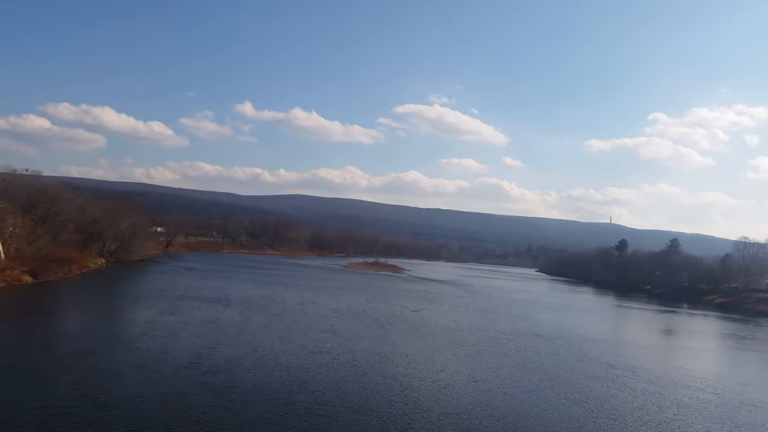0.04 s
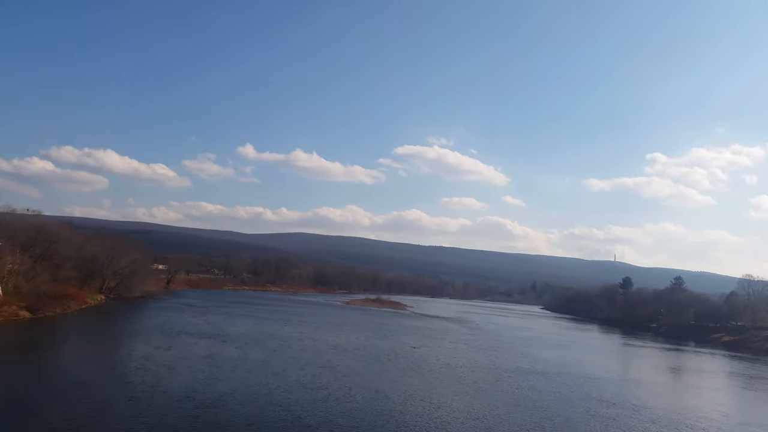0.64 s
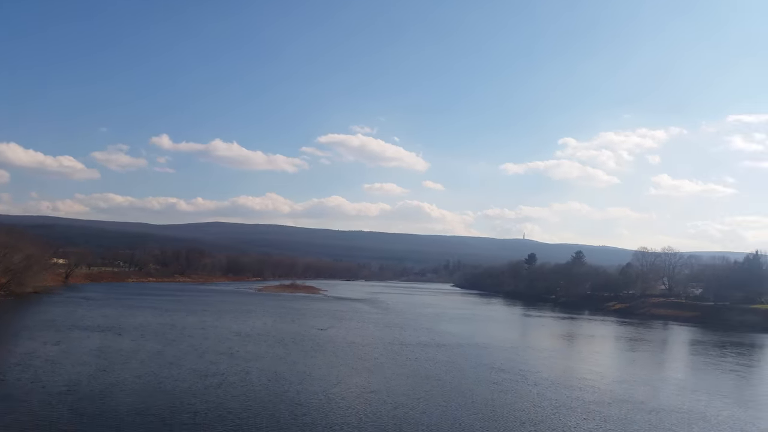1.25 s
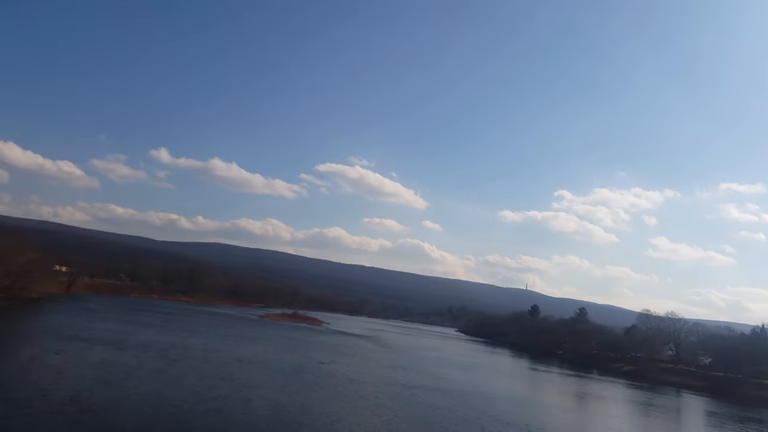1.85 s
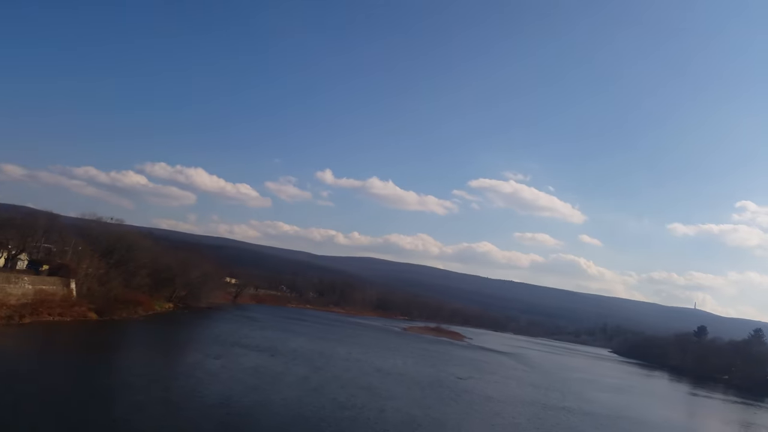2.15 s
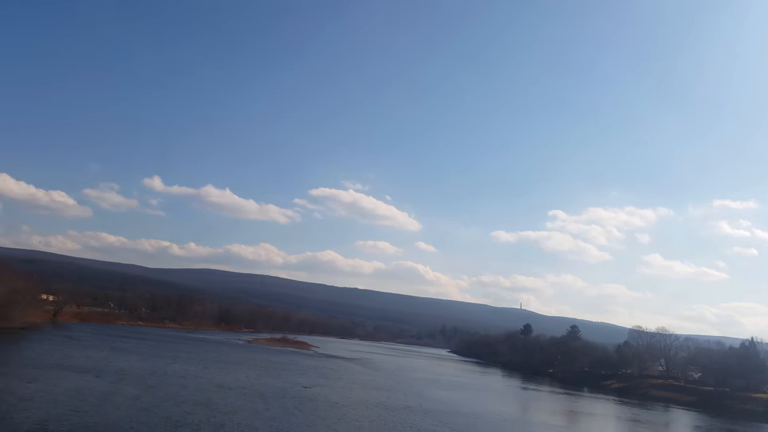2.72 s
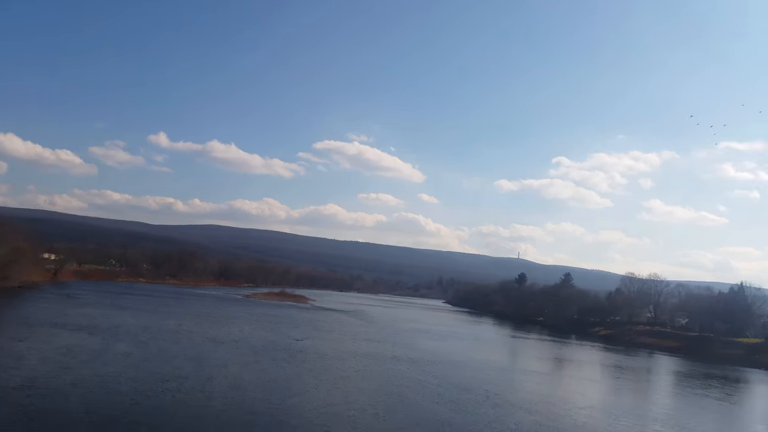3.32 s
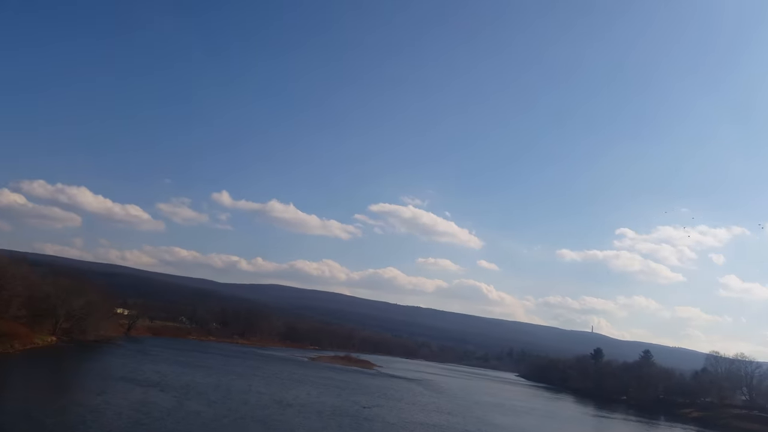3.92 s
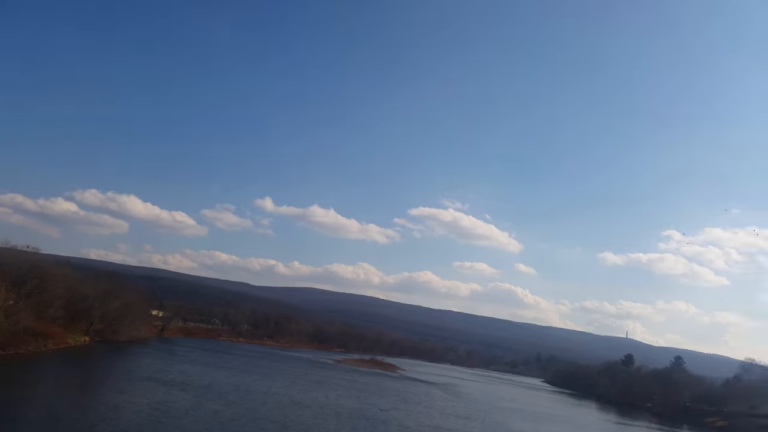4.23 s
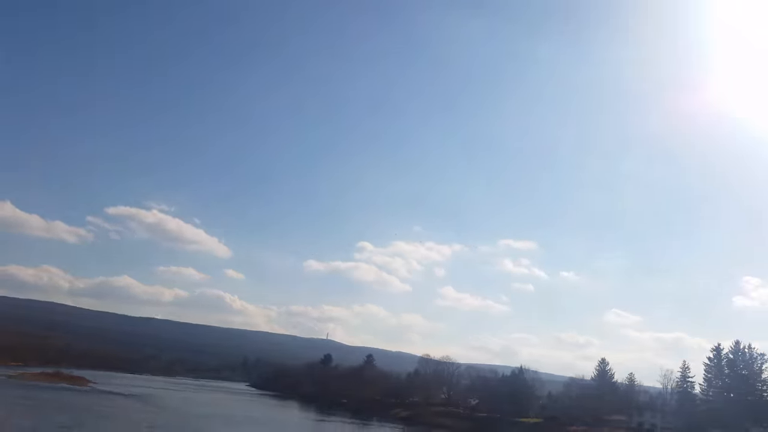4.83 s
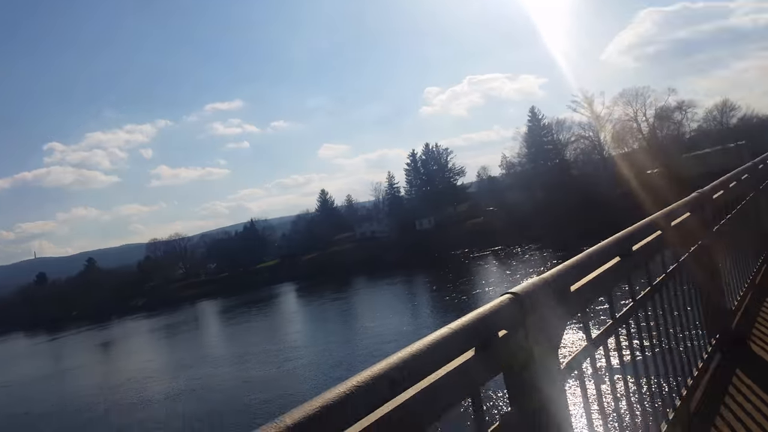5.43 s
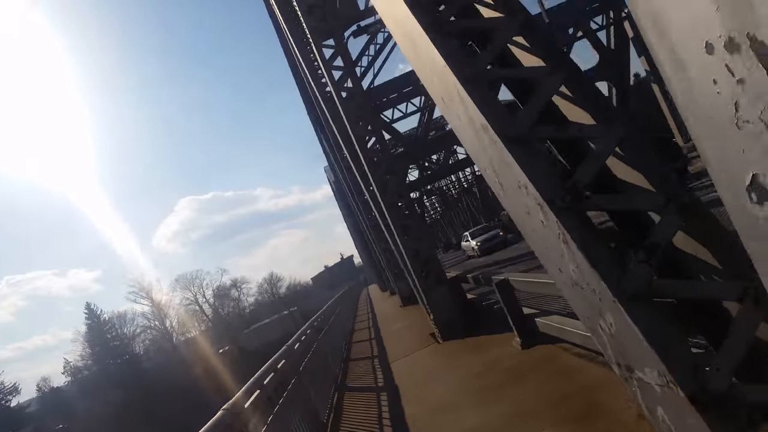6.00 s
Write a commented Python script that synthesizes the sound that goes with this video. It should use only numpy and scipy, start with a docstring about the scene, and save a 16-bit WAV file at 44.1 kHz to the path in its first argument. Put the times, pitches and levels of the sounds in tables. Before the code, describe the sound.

Low wind rumbles and thumps on the microphone as passing car tyres drone over a steel bridge and a bicycle chain ticks faintly.

```python
"""Wind buffets a two-port microphone riding, probably on a bicycle, along a steel bridge's walkway.
Its eddies rumble, thump and rip at each port. Three cars sing in turn as their tyres strike the ribbed
deck, over the boom of the deck and a wash of tyre roar. The chain sizzles faintly at first, link by
link; a hiss of rushing air grows at the end, as when the microphone turns to face ahead."""
import sys
import numpy as np
from scipy import signal
from scipy.fft import rfft, irfft
from scipy.io import wavfile
from scipy.ndimage import uniform_filter1d, minimum_filter1d

SR = 44100
rng = np.random.default_rng(int(sys.argv[2]) if len(sys.argv) > 2 else 0)


def waveform_to_disk(signal):
    """Save audio, clipped to [-1, 1], as 16-bit WAV at the path in sys.argv[1]."""
    frames = np.transpose(np.atleast_2d(signal))
    scaled = np.clip(frames, -1, 1) * 32767
    samples = np.round(scaled).astype(np.int16)
    wavfile.write(sys.argv[1], SR, samples)


N = 271656
T = np.arange(N) / SR
HZ = np.fft.rfftfreq(N, 1 / SR)


def gain_of(db):
    """Decibels to amplitude."""
    return 10 ** (np.asarray(db) / 20)


def unit_rms(x):
    """Scales to an rms of 1."""
    return x / np.sqrt(np.mean(abs(x) ** 2) + 1e-20)


def curves(rows):
    """Each column of a table, joined by straight lines in time."""
    times, *columns = np.transpose(rows)
    return [np.interp(T, times, column) for column in columns]


def spectra(rows):
    """Each column of a table, joined on a log-frequency axis."""
    hz, *columns = np.transpose(rows)
    return np.array([np.interp(np.log(HZ + 1), np.log(hz + 1), column) for column in columns])


def white(channels=2):
    """White noise spectra, one for each channel."""
    return rng.standard_normal((channels, len(HZ))) + 1j * rng.standard_normal((channels, len(HZ)))


def drift(rate_hz, channels=2):
    """A random wobble of rms 1, up to about rate_hz."""
    return unit_rms(irfft(white(channels) / (1 + (HZ / rate_hz) ** 4), N))


def bell(hz, width_hz):
    """Gain curve of one resonance."""
    return 1 / (1 + ((HZ - hz) / (0.51 * width_hz)) ** 2)


def swell(peak_s, length_s):
    """A smooth rise and fall around peak_s."""
    return np.exp(-(2 * (T - peak_s) / length_s) ** 2)


# Gusts that swell and die. Each row: peak time in seconds, length in seconds, peak level in dB,
# port (0 left, 1 right).
GUSTS = [(0.28, 0.19, -11.5, 0), (0.957, 0.38, -10.5, 0), (2.175, 0.22, -17, 0), (2.858, 0.27, -13.5, 0),
         (3.358, 0.44, -17, 0), (3.9, 0.16, -16, 0), (4.435, 0.33, -16, 0), (4.769, 0.045, -11, 0),
         (5.262, 0.15, -20.5, 0), (5.85, 0.15, -16.5, 0), (0.172, .22, -22.5, 1), (3.955, 0.22, -21, 1),
         (4.386, 0.17, -17, 1), (4.6, 0.38, -17, 1), (5.144, 0.1, -16.5, 1), (5.462, 0.086, -30, 1),
         (6.003, 0.17, -19, 1)]
# The tone of the turbulence. Each row: frequency in Hz, relative level in dB.
RUMBLE_TONE = [(8, -13.5), (20, -14.5), (40, -11), (60, -5), (90, -0.5), (130, -5), (200, -10.5),
               (300, -13), (500, -19), (900, -38.5), (2000, -53.5), (5000, -89)]


def wind(breeze_db=(-19.5, -20), unsteady_db=-0.64, lumpy_db=2, tearing_db=4.5, split_hz=240, leak=0.11):
    """Gusts ride on a breeze. Each port has its own turbulence, felt a little by the other."""
    power = gain_of(breeze_db)[:, None] ** 2 * np.ones(N)
    for peak_s, length_s, db, port in GUSTS:
        power[round(port)] += gain_of(db) ** 2 * swell(peak_s, length_s)
    push = np.sqrt(power) * gain_of(unsteady_db * drift(5))
    turbulence = unit_rms(irfft(white() * gain_of(spectra(RUMBLE_TONE)), N))
    large_eddies = irfft(rfft(turbulence) / (1 + (HZ / split_hz) ** 4), N)
    small_eddies = turbulence - large_eddies
    lumps = drift(37)  # one wobble drives both the heaving lows and the tearing highs
    heave = unit_rms(gain_of(lumpy_db * lumps))
    bursts = gain_of(-2) * unit_rms(gain_of(tearing_db * lumps))
    ports = push * (large_eddies * heave + small_eddies * bursts) + buffets()
    return ports + leak * ports[::-1]


# How far the right port, on the road side, leads. Each row: frequency in Hz, phase in radians.
RIGHT_PORT_LEAD = [(20, -1.5), (420, 0.08), (700, 2), (1000, -1), (1300, 4), (1800, 4.5), (2400, 7.5),
                   (3200, 9), (4100, 14.5), (6000, 29)]


def road_noise(tone, likeness):
    """Noise from the road side; reflections from the truss make the two ports less alike."""
    direct, scattered = white()
    lag = np.exp(-1j * spectra(RIGHT_PORT_LEAD)[0])
    left = likeness * direct * lag + np.sqrt(1 - likeness ** 2) * scattered
    return unit_rms(irfft(np.array([left, direct]) * tone, N))


# The deck's booming modes. Each row: centre in Hz, width in Hz, relative level in dB.
DECK_MODES = [(163.3, 10, -7), (178.7, 59, 1.5), (246, 37, -9), (300, 210, -15)]
# The fader ride on the boom. Each row: time in seconds, relative level in dB.
BOOM_RIDE = [(0, -20), (1.1, -22.5), (1.8, -24.5), (2.25, -17.5), (3.3, -20), (4.1, -16.5), (4.5, -20),
             (5.5, -20.5), (6.16, -18)]
# The tone of the tyre roar. Each row: frequency in Hz, relative level in dB.
ROAR_TONE = [(40, -10), (100, 4), (150, 3.5), (300, -1), (450, -0.5), (700, -3.5), (1000, -11.5),
             (1500, -18.5), (2000, -26.5), (2600, -32), (4000, -37), (6500, -68)]
# The roar's stereo image. Each row: frequency in Hz, likeness of the two ports from 0 to 1.
ROAR_LIKENESS = [(200, .95), (450, 0.97), (800, 0), (1300, 0.52), (1800, 0.5), (2600, 0.8), (5000, 0)]
# The ride on the roar. Each row: time in seconds, relative level in dB, lean to the left in dB.
ROAR_RIDE = [(0, -35.5, 1), (.3, -39.5, -0.5), (.75, -35, 0), (1, -42, -1), (1.4, -36, -0.5),
             (1.87, -34, -2), (2.25, -36, -1.5), (2.5, -33.5, 0), (2.9, -36, -1), (3.85, -35, -0.3),
             (4.4, -38, -0.3), (5.55, -37, 0), (6.03, -33, -0.5)]


def traffic(boom_db=0.5, roar_db=10.5, lean_db=-0.17, patchy_db=1.67):
    """Wheels keep the deck's modes booming under the broad roar of the tyres."""
    deck_tone = sum(gain_of(db) * bell(hz, width_hz) for hz, width_hz, db in DECK_MODES)
    boom = road_noise(deck_tone, likeness=0.91) * gain_of(curves(BOOM_RIDE)[0] + boom_db)
    roar = road_noise(gain_of(spectra(ROAR_TONE)[0]), spectra(ROAR_LIKENESS)[0])
    ride_db, pan_db = curves(ROAR_RIDE)
    roar *= gain_of(ride_db + np.array([pan_db, -pan_db]) + roar_db + patchy_db * drift(26))
    return (boom + roar) * gain_of([[lean_db], [-lean_db]])


# Cars singing on the deck. Each row: passing time in seconds, seconds to fade by 3 dB, rib rate in Hz,
# hum level in dB, overtone trim in dB, detune of each pair as a share, hum roughness from 0 to 1.
CARS = [(0.6, 1.8, 80.78, -25.5, -17, .02, 0.6), (2.498, 0.96, 115.7, -18, -1.5, .045, 0.47),
        (5.45, 0.5, 98.58, -18.5, -15, .04, 0.7)]
# The hum's partials; the upper ones are thrown ahead, so they peak earlier. Each row: multiple of
# the rib rate, relative level in dB, lead and span, both in fade times.
HUM_PARTIALS = [(2, -0.15, 0.022, 1), (3, -7.5, 0.85, 0.55), (4, -9, 0.12, 0.77), (5, -13, 0.78, 0.45),
                (6, -19, 0.09, 0.64)]
# One partial blooms or ducks, probably as echoes from the truss meet it. Each row: peak time in
# seconds, length in seconds, boost or cut in dB, multiple of the rib rate.
HUM_SWELLS = [(0.108, 0.13, 12.5, 2), (0.506, 0.073, 16.5, 2), (1.105, 0.13, -3, 2), (1.579, 0.33, 5, 3),
              (1.681, 0.053, 15.5, 4), (1.68, .12, 3.5, 2), (1.78, 0.082, -16, 4), (1.847, 0.1, 7, 3),
              (1.912, 0.15, 11.5, 4), (1.845, 0.15, 4, 2), (2.01, 0.15, 7.5, 2), (2.195, 0.075, 9.5, 6),
              (2.3, 0.048, 10.5, 2), (2.387, 0.054, -18, 4), (2.42, 0.11, -8, 2), (2.49, 0.06, 2.5, 4),
              (2.508, 0.042, 4.5, 2), (2.675, 0.045, 5, 2), (2.71, 0.21, 4, 5), (2.827, 0.12, -6, 2),
              (3.065, 0.35, 6.5, 2), (3.205, 0.05, 5, 2), (3.12, 0.12, 4.5, 6), (3.14, 0.22, 8.5, 3),
              (3.29, .2, 12.5, 5), (4.874, 0.2, 5, 2), (5.517, 0.12, 9, 2), (5.757, 0.11, 13, 2)]


def car(pass_s, fade_s, rib_hz, hum_db, overtones_db, detune, hum_rough,
        overtones_rough=0.56, blur_hz=10, waver=0.009, slowing_per_s=0.008, lean_db=1.0):
    """Tyres drum on the ribs. Each partial is a beating pair, blurred by echoes, fading with distance."""
    pair_hz = rib_hz * (1 - slowing_per_s * (T - pass_s)) * (1 + detune * np.array([[-.5], [.5]]))
    turns = np.cumsum(pair_hz * (1 + waver * drift(7.6)), axis=1) / SR
    pair_gains = unit_rms(gain_of([0, -5.5])) / np.sqrt(2)
    hum = np.zeros(N)
    for multiple, db, lead, span in HUM_PARTIALS:
        is_overtone = multiple > 2
        distance = np.hypot(1, ((T - pass_s) / fade_s + lead) / span)
        swell_db = sum(boost_db * swell(peak_s, length_s)
                       for peak_s, length_s, boost_db, which in HUM_SWELLS
                       if which == multiple and nearest_pass(peak_s) == pass_s)
        rough = overtones_rough if is_overtone else hum_rough
        blur_real, blur_imag = drift(blur_hz * np.sqrt(multiple / 2))
        swing = np.sqrt(2 - 2 * rough ** 2) * gain_of(swell_db) + rough * (blur_real + 1j * blur_imag)
        pair = pair_gains @ np.exp(2j * np.pi * multiple * turns)
        hum += gain_of(hum_db + db + overtones_db * is_overtone) * (swing * pair).real / distance
    return hum * gain_of([[lean_db], [-lean_db]])


def nearest_pass(time_s):
    """The passing time of the car that goes by closest to time_s."""
    return min((row[0] for row in CARS), key=lambda pass_s: abs(pass_s - time_s))


# The ride on the rushing air. Each row: time in seconds, relative level in dB.
AIR_RIDE = [(0, -50), (.3, -54.5), (.78, -50.5), (1.08, -62.5), (1.3, -54), (2.3, -53.5), (2.47, -51),
            (3.55, -53), (3.72, -50.5), (4.05, -51), (4.35, -53.5), (4.9, -49), (5.1, -46), (5.25, -45),
            (5.4, -48.5), (5.5, -44.5), (5.85, -41), (5.97, -36.5), (6.16, -36.5)]
# Each port's colour, with its notch and resonance; it tints the chain too.
# Each row: frequency in Hz, left gain in dB, right gain in dB.
PORT_TONE = [(800, -21.5, -20.5), (2500, 1, 1.5), (3500, -18, 3), (5060, -20, 2), (5570, -25, -11.5),
             (6300, -33, -33.5), (8140, -15.5, -32.5), (8580, -6, -30), (9140, -5, -9), (11000, -2.5, 1),
             (11250, -1, 2), (13000, -8, -0.5), (14500, -8, -3.5)]


def air_hiss(level_db=4, flutter_db=1.3, flutter_hz=45, low_follows=0.42, low_db=-3.0, split_hz=6500):
    """Fine turbulence hisses through the ports and flutters; the top follows the air speed most."""
    ride_db, = curves(AIR_RIDE)
    hiss = unit_rms(irfft(white() * gain_of(spectra(PORT_TONE)), N))
    low = irfft(rfft(hiss) / (1 + (HZ / split_hz) ** 8), N)
    top = hiss - low
    middle_db = np.median(ride_db)
    low_ride_db = middle_db + low_follows * (ride_db - middle_db) + low_db
    flutter = gain_of(level_db + flutter_db * drift(flutter_hz, channels=1))
    return flutter * (low * gain_of(low_ride_db) + top * gain_of(ride_db))


# The ride on the chain's sizzle. Each row: time in seconds, relative level in dB.
CHAIN_RIDE = [(0, -63), (.3, -58), (.7, -48), (1.05, -60), (1.25, -51), (1.75, -58.5), (2.3, -58.5),
              (2.5, -51), (3.1, -54.5), (3.6, -55.5), (4.2, -57), (4.8, -72)]
# Brief, bright high ticks and clinks. Each row: start in seconds, relative level in dB.
CLINKS = [(.049, -45), (.164, -45), (0.244, -49), (.412, -44), (.47, -41), (0.547, -44.5), (.698, -46),
          (1.24, -51), (1.292, -48), (1.475, -56), (1.866, -46), (1.982, -44.5), (2.179, -40), (2.414, -44),
          (2.454, -46), (2.807, -41), (2.902, -43), (3.043, -41), (3.121, -39), (4.302, -43), (5.59, -35),
          (5.946, -28)]


def chain(links_per_s=51.3, level_db=-6.5, uneven_db=6.5, ring_s=0.0052,
          clink_db=-1.0, clink_ring_s=0.0091, bright_hz=6000, waver=0.008):
    """Each link lands on a sprocket tooth with a tiny metallic burst, some harder than others."""
    ride_db, = curves(CHAIN_RIDE)
    link_rate = links_per_s * (1 + waver * drift(2.0, channels=1)[0])
    links = np.cumsum(link_rate) / SR
    accent_db = uneven_db * rng.uniform(-1, 1, N)[links.astype(int)]
    since_landing_s = (links % 1) / link_rate
    ticks = unit_rms(gain_of(accent_db) * np.exp(-since_landing_s / ring_s))
    envelope = gain_of(ride_db + level_db) * ticks
    for start_s, db in CLINKS:
        envelope += gain_of(db + clink_db) * (T >= start_s) * np.exp(-abs(T - start_s) / clink_ring_s)
    tone = gain_of(spectra(PORT_TONE)) * HZ ** 2 / (HZ ** 2 + bright_hz ** 2)
    return uniform_filter1d(envelope, size=100) * unit_rms(irfft(white() * tone, N))


# The hardest thumps of wind. Each row: peak time in seconds, level in dB, pitch in Hz,
# port (0 left, 1 right).
BUFFETS = [(0.205, -8, 78.4, 0), (0.23, -7, 280, 0), (.252, -17, 110, 0), (0.343, -2.5, 110, 0),
           (.836, -13, 98.5, 0), (0.879, -8, 162, 0), (0.948, 2, 94, 0), (1.009, -7, 81, 0),
           (1.069, -11, 87, 0), (1.118, -3.5, 273, 0), (2.124, -5, 105, 0), (2.207, 0, 86.6, 0),
           (2.251, -4, 280, 0), (2.288, -3.5, 273, 0), (2.868, -5, 103, 0), (3.238, -11, 95, 0),
           (3.405, -3, 84.5, 0), (4.265, -10, 100.5, 0), (4.281, -3, 278, 0), (4.319, -12, 131, 1),
           (4.355, -4, 97, 1), (4.388, -6, 99.4, 0), (4.413, -9, 88, 0), (4.457, -7, 97, 1),
           (4.522, -4.5, 98, 0), (4.587, -18, 79, 1), (4.666, -9.5, 76, 1), (4.728, -6, 107, 0),
           (5.195, -6, 75, 0), (5.31, -4, 116, 0), (5.45, -5, 102, 1), (5.48, -7, 73, 1),
           (5.899, -8, 110, 0)]


def buffets(width_cycles=0.73):
    """An eddy thumps a port with a soft swing or two of pressure: the smaller, the quicker."""
    out = np.zeros((2, N))
    for (peak_s, db, hz, port), phase in zip(BUFFETS, rng.random(len(BUFFETS))):
        near = abs(T - peak_s) < .06
        cycles = (T[near] - peak_s) * hz
        thump = np.cos(2 * np.pi * (cycles + phase)) / np.cosh(2 * cycles / width_cycles)
        out[round(port), near] += gain_of(db) * thump
    return out


# Sharp rips of wind. Each row: peak time in seconds, level in dB, length in seconds, centre in Hz,
# port (0 left, 1 right).
RIPS = [(0.233, -24, 0.0089, 750, 0), (.708, -23.5, 0.0042, 1050, 0), (0.778, -21.5, 0.0027, 1100, 0),
        (0.822, -20, 0.0076, 796, 0), (0.828, -29, 0.0042, 780, 0), (0.843, -21.5, 0.012, 855, 0),
        (0.881, -22.5, 0.0033, 800, 0), (0.92, -28, 0.0095, 940, 0), (2.19, -22.5, .005, 820, 0),
        (2.24, -19, .008, 760, 0), (2.274, -21, .005, 800, 0), (2.312, -25.5, 0.0025, 900, 0),
        (3.127, -24, .005, 800, 0), (4.286, -26, .004, 650, 0), (4.483, -17.5, 0.007, 640, 1)]


def rips(width_hz=820):
    """A tiny, fast eddy tears past a port in a few milliseconds."""
    out = np.zeros((2, N))
    for peak_s, db, length_s, hz, port in RIPS:
        envelope = swell(peak_s, length_s)
        noise = irfft(white(channels=1)[0] * bell(hz, width_hz) ** 2, N)
        out[round(port)] += gain_of(db) * unit_rms(noise * envelope) * np.sqrt(np.mean(envelope ** 2))
    return out


# Brief whistles and swishes. Each row: peak time in seconds, length in seconds, centre in Hz,
# width in Hz, level in dB, port (0 left, 1 right).
WHISTLES = [(0.705, 0.02, 8850, 820, -47, 0), (0.754, 0.37, 5420, 1220, -56.5, 1),
            (1.246, 0.023, 9100, 700, -47.5, 0), (1.32, 0.13, 9100, 1200, -54, 0),
            (2.81, 0.035, 4300, 2200, -52, 1), (3.117, .04, 4300, 2200, -51, 1),
            (3.053, 1, 5510, 800, -59, 1), (3.738, 0.55, 4240, 800, -51.5, 1),
            (3.753, 0.32, 5240, 800, -58, 0), (4.51, 0.084, 4700, 300, -62.5, 1),
            (4.64, 0.1, 4640, 300, -54.5, 1), (5.088, 0.17, 4680, 270, -52.5, 1),
            (5.14, 0.23, 4900, 500, -65, 0), (5.6, 0.35, 10440, 500, -47, 0),
            (5.96, 0.082, 4800, 500, -46.5, 1), (6.045, 0.2, 2070, 420, -39.5, 1),
            (6.05, 0.22, 2200, 1000, -40.5, 0), (6.07, 0.24, 4300, 1600, -46.5, 1),
            (6.026, 0.2, 4200, 1190, -52, 0), (6.038, 0.24, 7750, 1100, -48, 0),
            (6.037, 0.26, 7450, 900, -51, 1)]


def whistles():
    """Bands of noise swell and fade as brief whistles and swishes."""
    out = np.zeros((2, N))
    for peak_s, length_s, hz, width_hz, db, port in WHISTLES:
        band = unit_rms(irfft(white(channels=1)[0] * bell(hz, width_hz), N))
        out[round(port)] += gain_of(db) * band * swell(peak_s, length_s)
    return out


# The bands of the tread's hiss. Each row: centre in Hz, width in Hz, relative level in dB.
TREAD_BANDS = [(1280, 610, 13), (2000, 700, -27.5), (3330, 600, -8.5)]


def tread_hiss(peak_s=1.68, length_s=0.86, level_db=-39):
    """Air pumped from the tread hisses ahead of the nearest car as it comes on."""
    tone = sum(gain_of(db) * bell(hz, width_hz) for hz, width_hz, db in TREAD_BANDS)
    return gain_of(level_db) * swell(peak_s, length_s) * road_noise(tone, likeness=0.91)


def scene():
    """Wind at the ports up front, the roadway behind it, and a fine top of air, whistles and chain."""
    buffeting = wind() + rips()
    roadway = traffic() + tread_hiss() + sum(car(*row) for row in CARS)
    return buffeting + roadway + air_hiss() + whistles() + chain()


def record(dry, ceiling=0.94, cutoff_hz=14690):
    """A quick limiter holds the largest swings under full scale; a steep low-pass trims the top."""
    allowed = np.minimum(1, ceiling / (abs(dry) + 1e-9))
    held = minimum_filter1d(allowed, size=300)
    gain = uniform_filter1d(uniform_filter1d(held, size=150), size=150)
    low_pass = signal.firwin(801, cutoff_hz, window=("kaiser", 9), fs=SR)
    return signal.oaconvolve(dry * gain, low_pass[None], "same")


dry = scene()
out = record(dry)
waveform_to_disk(out)
```